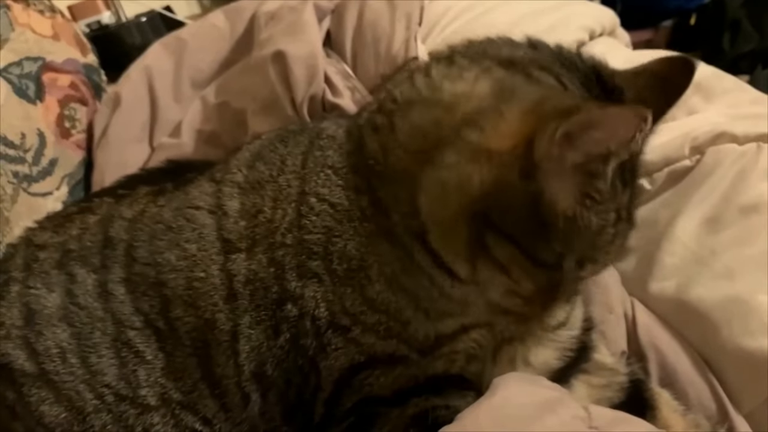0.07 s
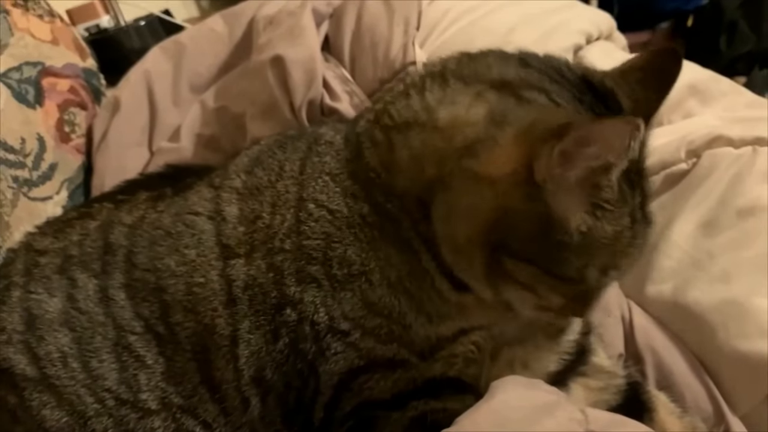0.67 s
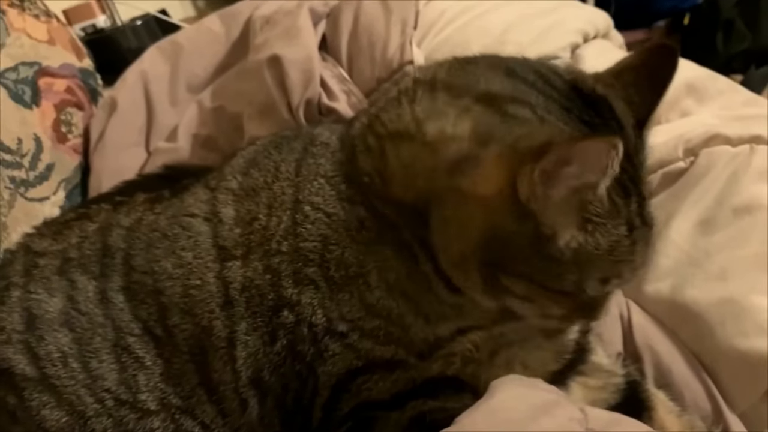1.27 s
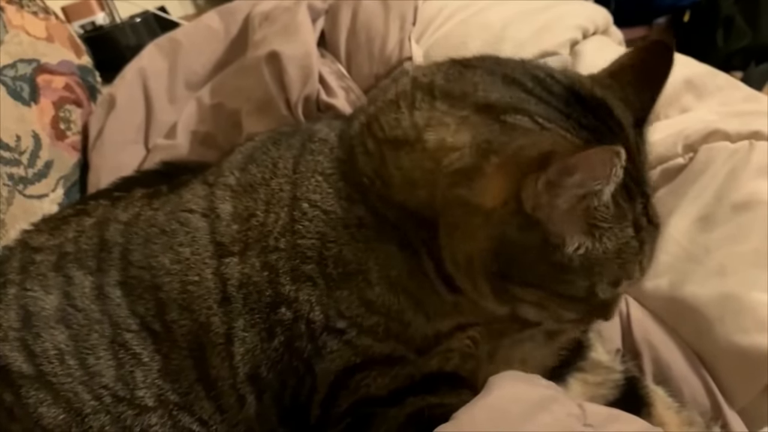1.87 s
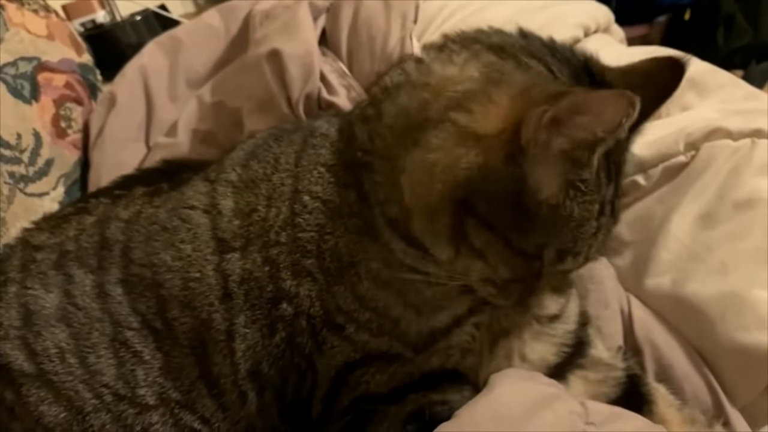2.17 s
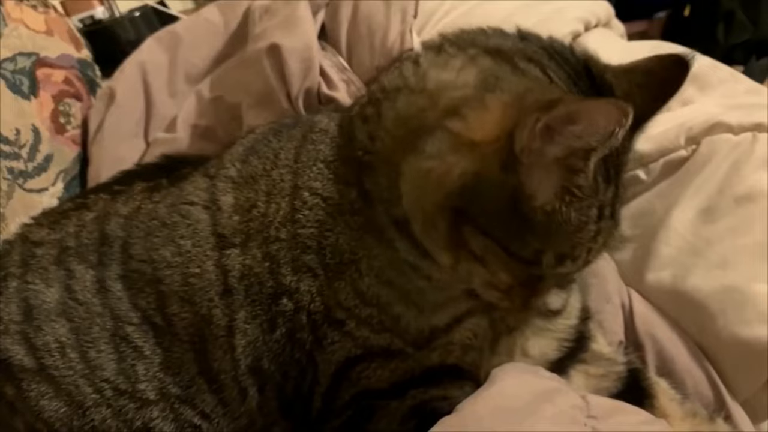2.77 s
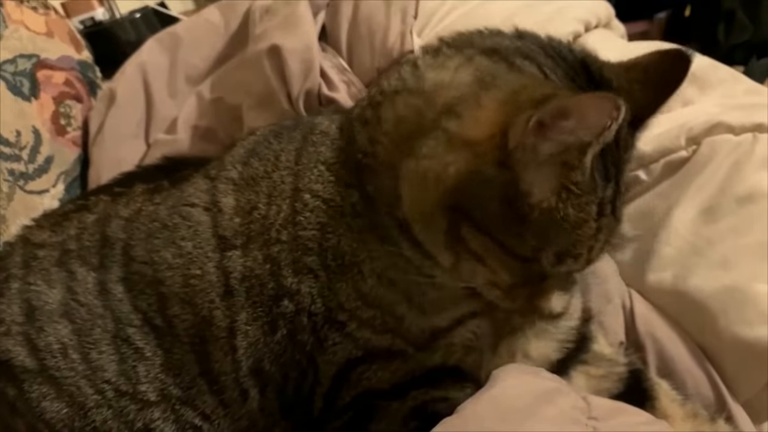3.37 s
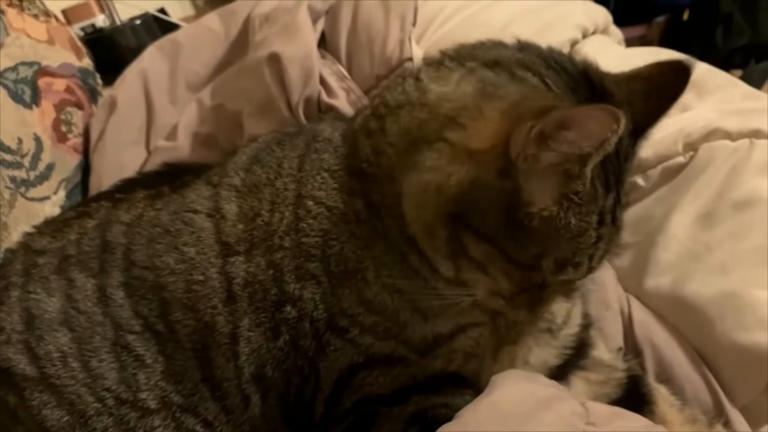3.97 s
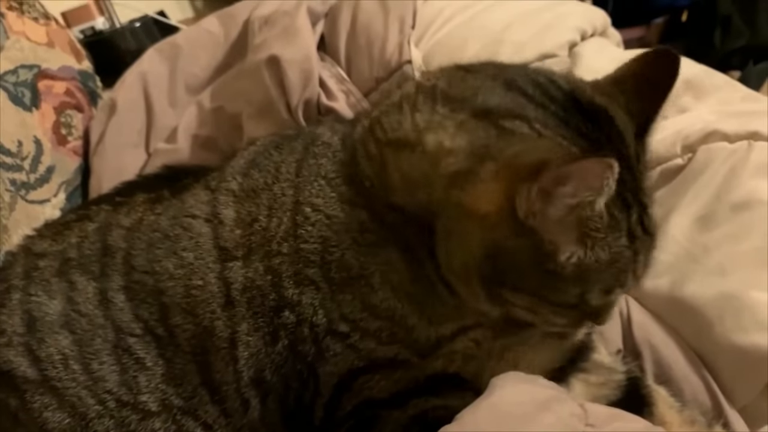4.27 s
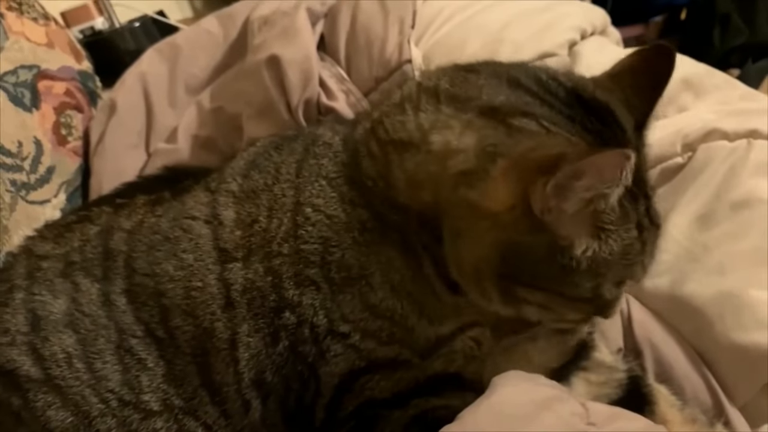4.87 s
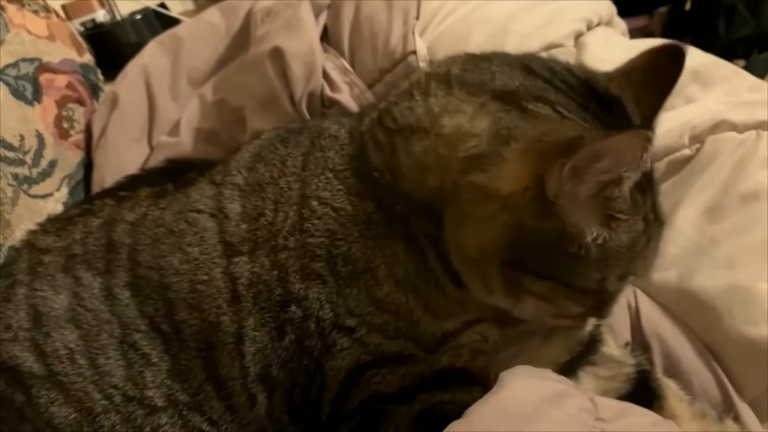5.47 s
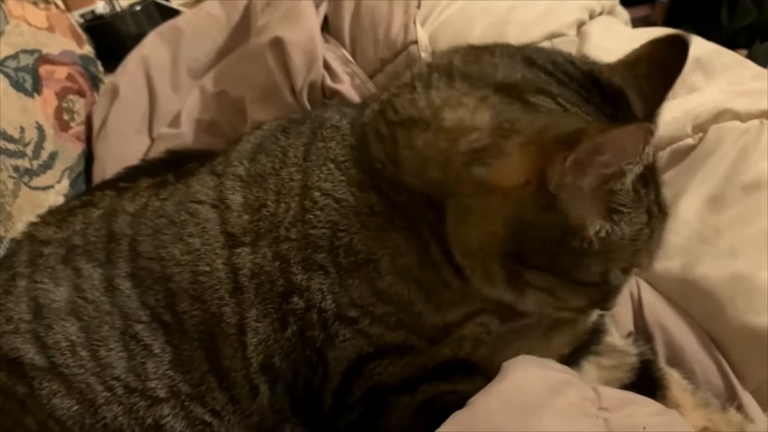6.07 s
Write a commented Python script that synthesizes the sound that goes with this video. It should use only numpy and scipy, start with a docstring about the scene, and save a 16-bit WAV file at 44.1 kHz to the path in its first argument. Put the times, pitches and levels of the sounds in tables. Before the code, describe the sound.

Quiet, steady licking and small wet smacks of a cat grooming on bedding, with faint rustling, hum and hiss behind.

```python
"""A quiet room, close up on a heap of bedding where a cat washes its fur.
About every .65 s its barbed tongue rasps through the coat, snagging tufts, and films of saliva
burst and click in its mouth. The moving head bumps the bedding and brushes the sheets.
Underneath lie a fan-like hum, a soft rumble and hiss, and a camera's faint ticking."""
import sys
import numpy as np
from scipy import signal
from scipy.fft import rfft, irfft, next_fast_len
from scipy.io import wavfile

SR = 44100
rng = np.random.default_rng(int(sys.argv[2]) if len(sys.argv) > 2 else 0)


def master_out(mix):
    """Clip the mix to full scale and print it as 16-bit PCM to the path in sys.argv[1]."""
    frames = np.transpose(np.atleast_2d(mix))
    ceiling = np.clip(frames, -1, 1)
    pcm = np.round(ceiling * 32767).astype(np.int16)
    wavfile.write(sys.argv[1], SR, pcm)


N = 270333
TIME = np.arange(N) / SR
FFT_SIZE = next_fast_len(N, True)
FREQ = np.maximum(np.fft.rfftfreq(FFT_SIZE, 1 / SR), 1)
TOP_HZ = 15700

# licks through the coat, timed at the hardest pull: t/s, level/dB, rise/s, fall/s, wet fizz/dB
LICKS = [(.08, -40.5, .15, 0.096, -56), (.51, -48.5, 0.049, 0.051, -48), (.667, -39, 0.053, 0.13, -53),
         (.96, -43, 0.017, 0.055, -48), (1.343, -42.5, 0.045, 0.14, -50), (1.99, -43, 0.066, 0.09, -55),
         (2.625, -35.5, 0.037, 0.084, -57), (3.195, -42.5, 0.037, 0.057, -61),
         (3.27, -41.5, 0.04, 0.062, -62), (3.39, -45, .04, .05, -62), (3.936, -32.5, 0.014, 0.094, -26),
         (4.055, -41.5, 0.017, .06, -38), (4.28, -44.5, 0.0096, .035, -52), (4.44, -47.5, 0.069, .04, -60),
         (4.58, -44, 0.098, 0.25, -62), (5.12, -36, 0.029, 0.069, -55), (5.78, -43, 0.074, 0.055, -68)]
def tongue_pull():
    """Envelope of the tongue's drag: each lick builds up, then lets go."""
    return np.sqrt(sum((amp(db) * swell(s, rise, fall)) ** 2 for s, db, rise, fall, _ in LICKS))


# EQ of the rasp, one curve a side: f/Hz, level/dB
RASP_EQ_LEFT = [(400, -2.5), (720, -9.5), (980, -4), (1180, -28), (1420, -9), (1540, 12), (1610, -3.5),
                (1700, 11), (1780, 4), (1850, 9.5), (2020, -12.5), (3500, -13), (12000, -46)]
RASP_EQ_RIGHT = [(400, -10), (750, -7.5), (950, -10), (1400, -10), (1600, -32), (1880, -61), (2040, -6.5),
                 (3500, -46), (12000, -41)]
def tongue_rasp(resting_db=-52.5, gain_db=1):
    """Hairs flick off the tongue's barbs, louder as it pulls; the coat never quite falls silent."""
    left, right = crackle(per_s=1300, spread_db=6, shared=.39)
    fur = unit(np.array([colour(left, RASP_EQ_LEFT), colour(right, RASP_EQ_RIGHT)]))
    return fur * amp(gain_db) * np.hypot(tongue_pull(), amp(resting_db))


# big tufts slipping off the barbs: t/s, level/dB, f/Hz, pan (left minus right)/dB
SNAGS = [(.11, -32.5, 1520, 4), (.629, -25, 1670, 12), (.641, -37, 1560, 7), (0.645, -37, 1480, 7),
         (.662, -19.5, 1540, 5), (0.6668, -18, 1580, 11), (.670, -30, 1410, 2), (0.703, -29, 1530, 3),
         (0.752, -32, 1570, 1), (1.31, -28, 1460, 3), (1.318, -26, 1700, 12), (1.333, -32, 1600, 7),
         (1.3392, -20.5, 1650, 13), (1.341, -25, 1420, 0), (1.345, -20, 1730, 13), (1.3578, -28, 1600, 7),
         (1.955, -31, 1690, 13), (2.599, -26, 1570, 3), (2.604, -25, 1610, 3), (2.612, -27, 1630, 6),
         (2.615, -11.5, 1670, 6), (2.62, -14, 1730, 7), (2.661, -24, 1550, -2), (3.1415, -30.5, 1780, 7),
         (3.9348, -12, 1750, 15), (3.9417, -13.5, 1730, 13), (4.054, -24, 1800, 12), (4.268, -34, 1660, 11),
         (5.103, -30, 1630, 12), (5.112, -22, 1640, 12), (5.119, -22.5, 1640, 9), (5.1233, -24.5, 1350, 4),
         (5.131, -28, 1700, 4), (5.165, -33, 1650, 6), (5.689, -30, 1670, 10)]
# the coat's muffling of a snag: f/Hz, level/dB
COAT_EQ = [(400, -19), (800, -2), (1030, 8.5), (1200, 6.5), (1400, -1), (1860, -2), (2020, -37),
           (3800, -10), (6000, -40), (14000, -60)]
def snags(decay_s=.00087, trail_s=.02, trail_db=-16, small_db=-20, small_hz=1600, gain_db=1):
    """Each tuft lets go with a dull tick, and loose hairs crackle after it."""
    out, t = np.zeros((2, N)), TIME[:SR // 16]
    hairs = crackle(per_s=3000, spread_db=2, shared=.4)
    for s, db, hz, pan_db in SNAGS:
        add(out, s, amp(db) * pop(hz, decay_s), pan_db)
        trail = np.exp(-t / trail_s) * hairs[:, int(s * SR):][:, :len(t)]
        add(out, s, amp(db + trail_db) * trail, pan_db)
    # small tufts catch at random, harder as the tongue pulls
    catches = amp(small_db) * tongue_pull() * crackle(per_s=190, spread_db=2, shared=.7)
    add(out, 0, signal.fftconvolve(catches, pop(small_hz, decay_s)[None], axes=1), pan_db=5)
    return amp(gain_db) * late_right(colour(out, COAT_EQ), lag_s=.00008)


# wet mouth clicks: t/s, level/dB, cavity f/Hz, decay/s, snap/dB
SMACKS = [(0.6199, -27.5, 1450, .00055, -27.5), (1.627, -36, 1510, 0.00068, -28.5),
          (2.0793, -28, 1160, 0.00039, -40), (2.088, -29, 1210, 0.00083, -37),
          (2.098, -30, 1100, 0.00034, -41), (3.1693, -28, 1600, 0.0005, -24.5),
          (3.924, -32, 1700, 0.00055, -26), (3.937, -5, 1680, 0.00078, -4),
          (3.9383, -11.5, 1100, 0.00061, -9), (3.975, -21, 1320, .0007, -40),
          (3.980, -14.5, 1450, 0.00049, -33), (4.029, -23.5, 970, 0.00078, -38),
          (4.043, -15.5, 2050, 0.00051, -31), (4.0446, -7.5, 1730, 0.00047, -14.5),
          (4.479, -36, 1210, 0.00051, -34), (4.4864, -36.5, 1050, 0.00051, -28),
          (4.6467, -19.5, 1780, 0.00024, -45), (4.650, -15, 1350, 0.00036, -47),
          (4.654, -31, 1460, 0.0013, -48), (4.664, -22.5, 1190, 0.00076, -48),
          (4.674, -34, 1110, 0.00064, -50), (4.745, -36, 2100, .0003, -33),
          (5.2073, -22.5, 1260, 0.00028, -42), (5.2098, -27.5, 756, 0.0017, -44),
          (5.7945, -24.5, 785, 0.0005, -48), (5.8015, -24, 680, 0.0014, -42)]
def smacks(dull_hz=3400, bright_hz=22000):
    """A bursting saliva film rings the mouth cavity; its sharp edge wakes the higher resonances."""
    out = np.zeros((2, N))
    jaw_tunings = 1 + .005 * rng.standard_normal(len(SMACKS))
    for (s, db, hz, decay, snap_db), tuning in zip(SMACKS, jaw_tunings):
        body = low_cut(pop(hz, decay), .59 * hz)
        add(out, s, amp(db) * body, pan_db=3)
        cutoff_hz = dull_hz + bright_hz * amp(snap_db) ** 2  # harder snaps are brighter
        snap = high_cut(mouth_ring(tuning), cutoff_hz)
        add(out, s, amp(snap_db) * snap)
    return late_right(out, lag_s=.00006)


# resonances of the mouth: f/Hz, bandwidth/Hz, level/dB
MOUTH_MODES = [(1180, 200, -2), (1747, 130, 4), (3070, 205, 8), (3563, 120, 0), (3890, 170, 3),
               (4830, 244, 1.5), (7580, 1840, 10), (9400, 2000, -6)]
def mouth_ring(tuning=1, cut_hz=900):
    """The short ring of the mouth after one click, peak 1."""
    t = TIME[:SR // 40]
    ring = np.zeros(len(t))
    for k, (hz, width, db) in enumerate(MOUTH_MODES):
        envelope = amp(db) * np.exp(-np.pi * width * t)
        ring += (-1) ** k * envelope * np.sin(2 * np.pi * hz * tuning * t)
    ring = low_cut(ring, cut_hz)
    return ring / np.abs(ring).max()


def saliva(stray_db=-73, spray_db=-33):
    """Tiny bubbles fizz around each hardest pull and each smack; a few strays tick in between."""
    wet = sum(amp(fizz_db) * swell(s, .6 * rise, .22 * fall) for s, _, rise, fall, fizz_db in LICKS)
    spray = sum(amp(db + spray_db) * swell(s, rise_s=.01, fall_s=.0075) for s, db, *_ in SMACKS)
    fizz = crackle(per_s=1800, spread_db=3, shared=.4)
    strays = crackle(per_s=14, spread_db=7, shared=1)
    bubbles = np.hypot(wet, spray) * fizz + amp(stray_db) * strays
    ring = mouth_ring()
    return signal.fftconvolve(bubbles, ring[None] / np.linalg.norm(ring), axes=1)[:, :N]


# EQ of the lips in the coat: f/Hz, level/dB
LIPS_EQ = [(300, 6), (650, -8.5), (850, 4), (1850, .5), (2050, -12.5), (2300, 0.5), (2740, -4),
           (3000, -0.5), (5100, -2), (5400, -5), (6500, 2), (9000, 1), (11500, 4), (15000, -8)]
def through_lips(x):
    """Mouth sounds leave through lips pressed into the fur."""
    return colour(x, LIPS_EQ)


# soft knocks of jaw and head on the bedding: t/s, level/dB, f/Hz
BUMPS = [(0.024, -23, 116), (0.039, -18, 69), (0.111, -28.5, 366), (2.085, -31.5, 317),
         (2.456, -16.5, 69.7), (2.547, -17, 65), (2.611, -25, 61), (2.742, -23.5, 210), (2.752, -12, 69),
         (4.028, -24.5, 260), (4.034, -22, 123), (4.649, -26, 434), (5.21, -25.5, 420), (5.795, -31, 440),
         (5.802, -30, 340), (5.912, -30, 120)]
# EQ of cloth giving way: f/Hz, level/dB
CLOTH_EQ = [(70, -22), (150, -25), (400, 3.5), (560, -7), (800, -5), (1300, -25), (3000, -49)]
def bedding_bumps(decay_cycles=.63, cloth_db=-13, settle_s=.022, pan_db=1):
    """The head lands in dead, low thuds; the sharper ones also set the cloth rustling briefly."""
    out, t = np.zeros((2, N)), TIME[:SR // 8]
    cloth = unit(colour(crackle(per_s=1900, spread_db=11.5, shared=.85), CLOTH_EQ))
    for s, db, hz in BUMPS:
        add(out, s, amp(db) * pop(hz, decay_cycles / hz), pan_db)
        sharpness = min(hz / 360, 1) ** 2
        settling = np.exp(-t / settle_s) * cloth[:, int(s * SR):][:, :len(t)]
        add(out, s, amp(db + cloth_db) * sharpness * settling, pan_db)
    return out


# brushes of the coat on the sheets: t/s, level/dB, rise and fall/s
BRUSHES = [(.07, -51.5, 0.073), (.28, -49, 0.041), (.77, -47.5, 0.033), (.96, -49, 0.035),
           (1.08, -54, 0.042), (1.19, -50, 0.012), (1.35, -52.5, 0.11), (1.62, -45.5, 0.042),
           (2.09, -46, 0.03), (2.46, -47.5, 0.021), (2.57, -48, 0.037), (2.85, -49.5, 0.11),
           (3.17, -48.5, 0.072), (3.4, -53, .04), (3.51, -47, 0.022), (4.13, -50.5, 0.084),
           (4.44, -56, 0.051), (4.57, -50, 0.02), (4.76, -47.5, 0.026), (5.0, -56, 0.13), (5.25, -50, 0.03),
           (5.46, -48.5, 0.019), (5.63, -48, 0.078), (6.1, -50.5, 0.043)]
# their dry, bright EQ: f/Hz, level/dB
RUSTLE_EQ = [(800, -38), (2400, 13.5), (4200, 13.5), (7000, 8.5), (8500, 0.5), (11000, 10.5), (15000, -25)]
def sheet_rustle(resting_db=-61, patchy_db=3, patches_per_s=14):
    """The coat shifts on the sheets in faint, uneven swells as the head moves."""
    hairs = colour(crackle(per_s=1900, spread_db=4, shared=1), RUSTLE_EQ)
    movement = sum(amp(db) * swell(s, length, length) for s, db, length in BRUSHES)
    patches = amp(patchy_db * np.tanh(drift(patches_per_s)))
    return np.hypot(movement, amp(resting_db)) * unit(hairs * patches)


# the low hum's uneven swells and dips: t/s, level/dB
HUM_LEVEL = [(0.0, -23.5), (.55, -27.5), (0.7, -34), (.8, -26), (1.25, -25), (1.39, -29.5), (1.67, -24),
             (1.81, -28.5), (2.09, -21.5), (2.37, -33), (2.55, -23.5), (2.64, -19.5), (2.74, -30),
             (2.84, -24.5), (3.25, -29), (3.48, -26.5), (3.76, -30.5), (4.15, -26), (5.1, -26), (5.29, -25),
             (6.13, -27)]
# the hum's upper tones: f/Hz, level/dB, pitch wander/Hz
HUM_TONES = [(114.25, -43, 1.99), (227.8, -49, 1.733), (357, -57.5, 2.46)]
def motor_hum(low_hz=57.05, low_trim_db=-3, low_waver_db=1.4, waver_db=3.5):
    """A motor drones in low tones that waver in pitch and strength."""
    swell_db = np.interp(TIME, *np.transpose(HUM_LEVEL))
    out = tone(low_hz, wander_hz=.93) * amp(low_trim_db + swell_db + low_waver_db * drift(8))
    for hz, db, wander_hz in HUM_TONES:
        out += amp(db) * unit(tone(hz, wander_hz) * amp(waver_db * drift(9.7)))
    return pan(out, pan_db=1)


# EQ of the room's rumble and hiss: f/Hz, level/dB
ROOM_EQ = [(20, -30), (38, -12), (55, -5.5), (72, -5.5), (95, -14.5), (120, -15), (165, -26), (230, -22),
           (330, -29.5), (600, -34.5), (2000, -38), (6000, -44), (10500, -43), (15500, -49.5)]
# its stereo image: f/Hz, left-right correlation
ROOM_IMAGE = [(60, 0.71), (120, 0.78), (350, 0.32), (800, -0.0038), (2500, -0.22), (4500, -0.082),
              (6600, 0.13), (8600, -0.88), (10900, 0.32), (13400, -0.57), (15500, -0.25)]
def room_tone(level_db=-33, treble_spread_db=.9):
    """Rumble alike on both sides, and a wide, soft hiss."""
    likeness = np.clip(across(ROOM_IMAGE), -.95, .95)
    spectra = rfft(rng.standard_normal((2, FFT_SIZE))) * amp(across(ROOM_EQ))
    mid, side = spectra * np.sqrt([1 + likeness, 1 - likeness])
    noise = unit(irfft(np.array([mid + side, mid - side]), FFT_SIZE)[:, :N])
    treble = colour(noise, [(500, -40), (2000, 0)])
    treble_gain = amp(treble_spread_db * drift(18))
    return amp(level_db) * (noise + treble * (treble_gain - 1))


# thin, airy EQ of the camera's tick: f/Hz, level/dB
TICK_EQ = [(3000, -32), (6500, 0), (10500, 7), (15000, -12)]
def camera_ticks(level_db=-44, per_s=30, first_s=.01224, width_s=.00077, halo_db=-11, halo_s=.0033):
    """The camera's electronics tick faintly and evenly in the high treble."""
    from_tick_s = (TIME - first_s + .5 / per_s) % (1 / per_s) - .5 / per_s
    core = np.exp(-(from_tick_s / width_s) ** 2 / 2)
    halo = amp(halo_db) * np.exp(-np.abs(from_tick_s) / halo_s)
    hiss = unit(colour(rng.standard_normal((2, N)), TICK_EQ))
    return amp(level_db) * np.hypot(core, halo) * hiss


def reflections(x, t60_s=.18, wet_db=-12, predelay_s=.002):
    """A small, soft room gives a short diffuse tail."""
    t = TIME[:SR // 3]
    tail = rng.standard_normal((2, len(t))) * amp(-60 * t / t60_s) * (t > predelay_s)
    tail /= np.linalg.norm(tail, axis=1, keepdims=True)
    return amp(wet_db) * signal.fftconvolve(x, tail, axes=1)[:, :N]


def crackle(per_s, spread_db, shared):
    """Tiny random clicks of uneven size, rms 1; the two sides share part of them."""
    clicks = (rng.random((3, N)) < per_s / SR) * rng.choice([-1, 1], (3, N))
    clicks = clicks * amp(spread_db * np.clip(rng.standard_normal((3, N)), -2, 2))
    return unit(np.sqrt(shared) * clicks[0] + np.sqrt(1 - shared) * clicks[1:])


def pop(hz, decay_s):
    """A softly pushed, heavily damped resonance with peak near 1."""
    t = TIME[:int(10 * decay_s * SR)]
    return t / decay_s * np.exp(1 - t / decay_s) * np.sin(2 * np.pi * hz * t)


def tone(hz, wander_hz):
    """A sine of rms 1 whose pitch wanders."""
    pitch_hz = hz + wander_hz * drift(5.24)
    return unit(np.sin(2 * np.pi * np.cumsum(pitch_hz) / SR))


def swell(s, rise_s, fall_s):
    """An exponential rise to 1 at time s, and a fall away."""
    return np.exp(-np.minimum(np.maximum((s - TIME) / rise_s, (TIME - s) / fall_s), 20))


def drift(rate_hz):
    """Smooth random modulation, rms 1."""
    steps = rng.standard_normal(int(2 * rate_hz * N / SR) + 2)
    smooth = signal.resample(steps, 2048)
    return unit(np.interp(TIME, np.linspace(0, N / SR, len(smooth)), smooth))


def amp(db):
    """Decibels to gain."""
    return 10 ** (np.asarray(db) / 20)


def unit(x):
    """Scale to rms 1."""
    return x / np.sqrt(np.mean(x ** 2))


def across(points):
    """Join (f/Hz, value) points on a log-frequency axis."""
    hz, value = np.transpose(points)
    return np.interp(np.log(FREQ), np.log(hz), value)


def colour(x, eq):
    """Apply an EQ curve of (f/Hz, level/dB) points."""
    return irfft(rfft(x, FFT_SIZE) * amp(across(eq)), FFT_SIZE)[..., :N]


def low_cut(x, hz):
    """Roll off the lows steeply."""
    return signal.sosfilt(signal.butter(4, hz, "high", fs=SR, output="sos"), x)


def high_cut(x, hz):
    """Roll off the highs gently."""
    return signal.sosfilt(signal.butter(2, min(hz, TOP_HZ), fs=SR, output="sos"), x)


def pan(x, pan_db):
    """Lean a sound to the left by a level difference."""
    return amp([[pan_db / 2], [-pan_db / 2]]) * x


def late_right(x, lag_s):
    """The sound reaches the right side a little later."""
    return np.array([x[0], np.interp(TIME - lag_s, TIME, x[1])])


def add(out, s, sound, pan_db=0):
    """Mix a sound in at its time and place."""
    start = max(int(s * SR), 0)
    part = pan(sound, pan_db)[:, :N - start]
    out[:, start:start + part.shape[1]] += part


def scene():
    """The grooming cat up front, the bedding under it and the room behind."""
    clicks = snags() + through_lips(smacks() + saliva())
    cat = tongue_rasp() + clicks + reflections(clicks)
    bedding = sheet_rustle() + bedding_bumps()
    return cat + bedding + motor_hum() + room_tone() + camera_ticks()


def record(dry, bass_hz=29):
    """The recorder cuts the deepest bass and the top."""
    top_cut = signal.ellip(10, .2, 80, TOP_HZ, fs=SR, output="sos")
    return signal.sosfilt(top_cut, low_cut(dry, bass_hz))


dry = scene()
out = record(dry)
master_out(out)
```